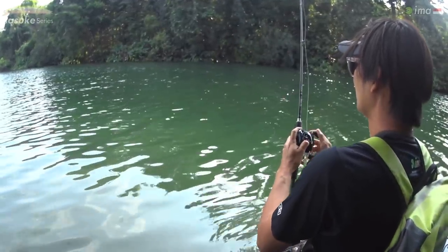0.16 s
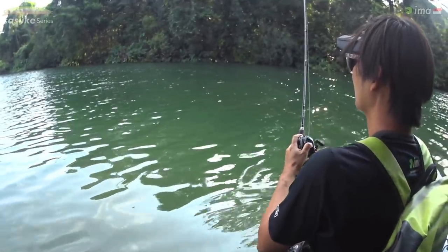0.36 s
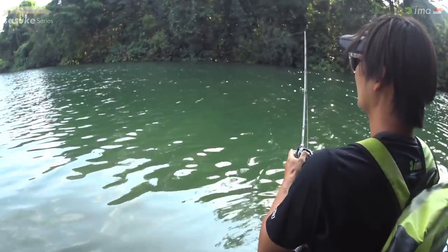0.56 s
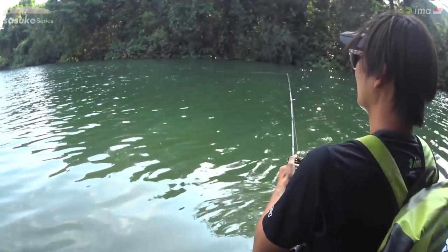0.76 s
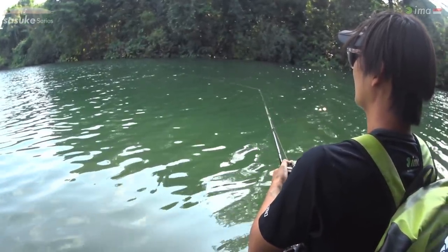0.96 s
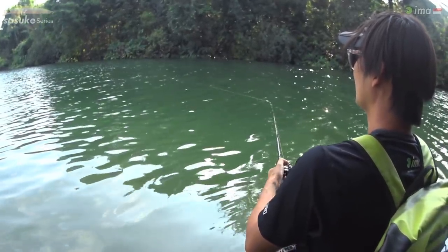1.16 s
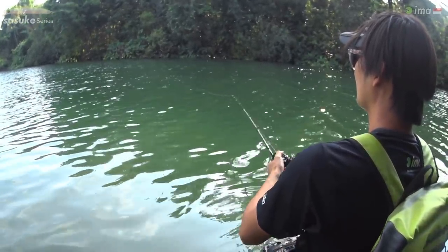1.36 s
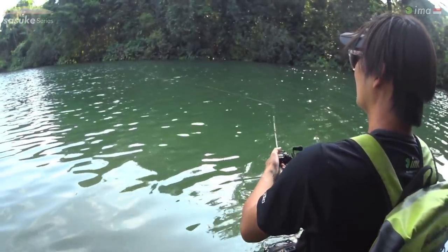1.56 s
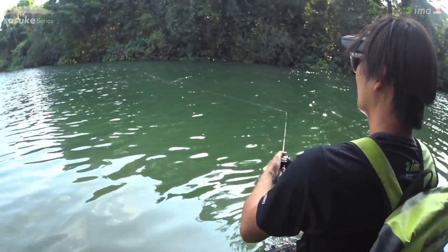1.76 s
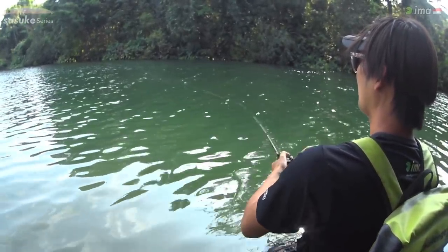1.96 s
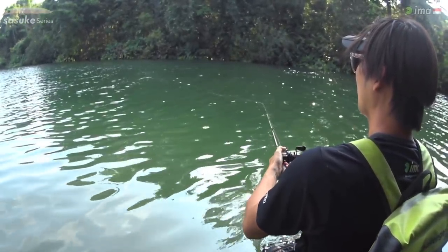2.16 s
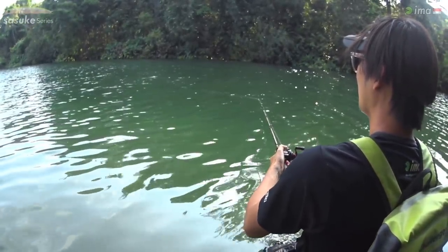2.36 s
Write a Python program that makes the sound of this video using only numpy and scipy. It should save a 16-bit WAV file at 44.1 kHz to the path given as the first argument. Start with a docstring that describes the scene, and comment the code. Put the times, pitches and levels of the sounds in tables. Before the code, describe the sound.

Close to a fishing reel on a quiet pond: one crisp click, a pulsing whine from the spinning spool, then the handle turning with faint ticks. A brief low flutter comes last, while water and leaves wash softly.

```python
"""On a quiet pond below a wooded bank, an angler casts with a baitcasting reel. After a soft rustle
and a creak, the clutch snaps into free spool, its impacts exciting the modes of the metal parts.
The spool sings in surges as line pays out, a harmonic series gliding through fixed resonances.
The handle turns with gear friction and light ticks; a low flutter, perhaps a motor or water on the
hull, sounds near the end. Water and leaves wash, the breeze puffs, and the bank gives a soft echo."""
import sys
import numpy as np
from scipy import signal
from scipy.fft import rfft, irfft
from scipy.io import wavfile

SR = 44100
rng = np.random.default_rng(int(sys.argv[2]) if len(sys.argv) > 2 else 0)


def store_wav(level_fs):
    """Save 16-bit WAV to argv[1]."""
    pcm = np.round(np.clip(np.atleast_2d(level_fs), -1, 1) * 32767)
    wavfile.write(sys.argv[1], SR, pcm.T.astype(np.int16))


N = 105840
TIME, BIN_HZ = np.arange(N) / SR, np.fft.rfftfreq(N, 1 / SR)


def amp(db):
    """Decibels to amplitude ratio."""
    return 10 ** (np.asarray(db) / 20)


def unit(x):
    """Normalisation to rms 1."""
    return x / np.sqrt(np.mean(x ** 2) + 1e-20)


def read(points, hz):
    """Interpolation on a log-frequency axis."""
    f, value = np.transpose(points)
    return np.interp(np.log(hz + 1), np.log(f + 1), value)


def level(points):
    """Gain envelope through rows of time_s, level_db."""
    return amp(np.interp(TIME, *np.transpose(points)))


def colour(x, points):
    """Spectral shaping by rows of frequency_hz, gain_db; the result has rms 1."""
    return unit(irfft(rfft(x) * amp(read(points, np.fft.rfftfreq(len(x), 1 / SR))), len(x)))


def wander(hz):
    """Random modulation: low-passed noise at rms 1."""
    return unit(irfft(rfft(rng.standard_normal(N)) * np.exp(-(BIN_HZ / hz) ** 2), N))


def swell(middle_s, sigma_s):
    """Gaussian envelope."""
    return np.exp(-.5 * ((TIME - middle_s) / sigma_s) ** 2)


def add(mix, start_s, sound):
    """Superposition of a sound on the mix."""
    part = mix[round(start_s * SR):][:len(sound)]
    part += sound[:len(part)]


def diffuse(mid, other, lean=0.3):
    """Diffuse field: an independent signal in the side channel makes left and right partly coherent."""
    # frequency_hz, side_gain_db
    width = [(60, -12), (110, -9), (190, -8.5), (350, -1), (620, 2), (1120, 4), (2010, 3), (3620, -1),
             (6490, -4.5), (11700, -6.5)]
    side_spectrum = 1j * lean * rfft(mid) + np.sqrt(1 - lean ** 2) * rfft(other)
    side = irfft(side_spectrum * amp(read(width, BIN_HZ)), N)
    return np.array([mid + side, mid - side])


def water_and_leaves():
    """Many incoherent sources sum to a steady, slightly wavering wash of noise."""
    # frequency_hz, gain_db
    spectrum = [(15, -60), (25, -11), (50, -1.5), (80, -3.5), (130, -2), (218, -2), (412, -8), (759, -9.5),
                (1510, -15), (2000, -13.5), (3800, -17), (6300, -17.5), (7500, -15), (8970, -22.5),
                (10200, -21.5), (11000, -25.5)]
    # time_s, gain_db
    drift = [(0, -1), (.15, 0.5), (.4, 0.5), (.9, 1), (1.25, 0.5), (1.8, -0.5), (2.4, -0.5)]
    waver_db = 0.99
    mid, other = (colour(rng.standard_normal(N), spectrum) * amp(waver_db * wander(27)) for _ in range(2))
    return amp(-54) * level(drift) * diffuse(mid, other)


def reel_friction(grains_per_s=5000, spread_db=2):
    """Friction as dense random impulses, partly ringing the housing: a soft rustle of the hand on the
    reel and a creak before the snap, then gear rub at each handle stroke."""
    # middle_s, sigma_s, level_db, housing_share
    rubs = [(0.158, 0.053, -58, 0), (.225, 0.0052, -45.5, 0.3), (1.485, 0.016, -47.5, 0.48),
            (1.583, 0.058, -57.5, 0.24), (1.744, .019, -50.5, 0.48), (1.837, 0.028, -58, 0.23),
            (2.037, 0.014, -49.5, 0.6), (2.071, 0.018, -52, 0)]
    # frequency_hz, gain_db
    spectrum = [(200, -15), (450, 4), (750, 1.5), (1250, 6), (1700, 4.5), (2700, -2), (5000, 2.5),
                (9300, -3), (10400, -6), (11000, -4.5)]
    # mode_hz, bandwidth_hz, gain_db
    housing = [(965, 90, 0), (2050, 140, -8), (2750, 200, -14), (3600, 250, -15)]
    grains = rng.standard_normal(N) * amp(spread_db * np.minimum(rng.exponential(1, N), 4))
    grains *= rng.random(N) < grains_per_s / SR
    rub = colour(grains, spectrum)
    hollow = unit(sum(amp(db) * signal.lfilter(*signal.iirpeak(hz, hz / width, SR), grains)
                      for hz, width, db in housing))
    return sum(amp(db) * swell(middle, sigma) * unit(share * hollow + (1 - share) * rub)
               for middle, sigma, db, share in rubs)


def impacts(contacts, low_db=0, top_db=0, decay_scale=1):
    """Impact excitation: each contact knocks the frame and rings the damped modes of the metal parts."""
    # mode_hz, gain_db, t60_s
    modes = [(616, -32, 0.043), (800, -27, 0.045), (1406, -17, 0.033), (2040, -18, 0.033),
             (2450, -16, 0.027), (3330, -16, 0.017), (4530, -11, 0.013), (6120, -5, 0.018),
             (6360, -14, 0.0094), (8930, -12, .022), (8900, -18, .02), (10200, -2, 0.038),
             (10480, -2, .031), (10670, -18, 0.016)]
    # frequency_hz, gain_db
    frame = [(100, -67), (600, -15), (1300, -5.5), (2300, 3.5), (3500, 4.5), (5000, 0.5), (6500, 5.5),
             (8000, 4), (11000, 2)]
    attack_s, knock_s, top_from_hz = 0.00029, .0014, 9600
    out, t = np.zeros(N), np.arange(SR // 10) / SR
    for start_s, db, knock_db in contacts:
        ring = np.zeros(len(t))
        for hz, mode_db, t60 in modes:
            gain = amp(mode_db + (low_db if hz < top_from_hz else top_db))
            decay = 1000. ** (-t / (t60 * decay_scale))
            ring += gain * decay * np.sin(2 * np.pi * (hz * t + rng.random()))
        knock = colour(rng.standard_normal(len(t)), frame) * np.exp(-t / knock_s)
        attack = 1 - np.exp(-t / attack_s)
        add(out, start_s, amp(db) * attack * (amp(-18) * ring + amp(knock_db - 12.5) * knock))
    return out


def clutch_snap():
    """Impact and rebound: a latch tick, the main blow and its bounces, as heard near and at the bank."""
    # start_s, level_db, knock_gain_db
    contacts = [(.2293, -13, 8.5), (.2307, -24, -6), (.2346, -14, -2), (.2399, -13.5, 4), (.2411, -0.5, -1),
                (.2422, -0.5, -0.5), (.2448, 0, -10), (.2519, -7, -22)]
    snap = impacts(contacts)
    far_snap = impacts(contacts, low_db=-22, top_db=-4.5, decay_scale=0.92)  # the knock carries best
    return snap, far_snap


def spool():
    """Forced rotation: each pull of the line spins the spool up; its harmonics rise, then sag, over hiss."""
    # start_s, fastest_s, end_s, top_hz, end_hz, sag_exponent, level_db, jitter_fraction,
    # low_harmonics_db, sag_change_db
    surges = [(0.544, 0.557, 0.68, 1164, 1060, 0.57, -47, 0.0057, -1.5, 0),
              (0.715, 0.733, .772, 1204, 1060, 1.03, -44, .012, 0.5, 0),
              (0.811, 0.829, .862, 1210, 1058, 1.26, -43.5, .014, -1.5, -1.5),
              (0.898, 0.915, .946, 1251, 1050, 1.25, -44, 0.023, -1.5, -1.5),
              (.973, 0.988, 1.007, 1234, 1045, 1.3, -44, 0.027, -2.5, -3),
              (1.052, 1.071, 1.094, 1215, 1065, 1.35, -45.5, 0.024, -2, -5),
              (1.14, 1.165, 1.185, 1184, 1068, 1.37, -48.5, 0.027, 0, 2),
              (1.319, 1.341, 1.396, 1233, 1118, 1.176, -44, .008, 3.5, -5)]
    # harmonic_number, gain_db
    harmonics = [(3, -19.5), (4, -3.5), (5, -3.5), (6, -6.5), (7, -14), (8, -28)]
    # frequency_hz, gain_db
    hiss_spectrum = [(2000, -12.5), (3800, -11.5), (4700, 2.5), (5300, -2), (6000, -2), (7200, -2.5),
                     (8500, -9), (11000, -16.5)]
    # time_s, level_db
    hiss_level = [(.53, -80), (.62, -62), (.76, -59.5), (.95, -53.5), (1.2, -57), (1.3, -62), (1.4, -58),
                  (1.52, -61), (1.65, -64)]
    start_hz, attack_s, release_s, rasp_db = 1038.5, 0.011, 0.0086, -16
    tone, effort = np.zeros(N), np.zeros(N)
    jitter = wander(490)
    flickers = [1 + 0.43 * wander(130) for _ in harmonics]
    for start, fastest, end, top_hz, end_hz, curve, db, rough, low_db, fade_db in surges:
        at = (TIME > start) & (TIME < end + 5 * release_s)
        t = TIME[at]
        rise = np.sin(np.pi / 2 * np.clip((t - start) / (fastest - start), 0, 1)) ** 2
        sag = np.clip((t - fastest) / (end - fastest), 0, 1)
        hz = start_hz + (top_hz - start_hz) * rise + (end_hz - top_hz) * sag ** curve
        phase = 2 * np.pi * np.cumsum(hz * (1 + rough * jitter[at])) / SR
        attack = np.minimum((t - start) / attack_s, 1) ** 1.1
        release = np.exp(-np.maximum(t - end + release_s, 0) / release_s)
        envelope = amp(db + fade_db * sag) * attack * release
        effort[at] += envelope
        for (k, k_db), flicker in zip(harmonics, flickers):
            tone[at] += envelope * flicker[at] * amp(k_db + low_db * (k <= 4)) * np.sin(k * phase)
    hiss = colour(rng.standard_normal(N), hiss_spectrum) * (amp(rasp_db) * effort + level(hiss_level))
    return reel_body(tone + hiss)


def reel_body(x):
    """Resonances and antiresonances in series lift or cut each harmonic that sweeps through them."""
    # centre_hz, bandwidth_hz, gain_db
    peaks = [(4300, 73, 0.5), (4630, 150, -4.5), (4850, 83, 1), (5150, 210, -8.5), (5480, 300, 4.5),
             (5780, 130, -4), (6010, 130, 7.5), (6140, 220, -4), (6280, 51, 9), (6950, 190, 0.5),
             (7500, 260, -8)]
    for hz, width, db in peaks:
        a, g = np.pi * width / SR, amp(db / 2)
        tuning = -2 * np.cos(2 * np.pi * hz / SR)
        x = signal.lfilter([1 + a * g, tuning, 1 - a * g], [1 + a / g, tuning, 1 - a / g], x)
    return x


def breeze():
    """Turbulence at the microphone: puffs of low narrow-band noise."""
    # middle_s, sigma_s, level_db, centre_hz
    puffs = [(0.693, 0.016, -49.5, 105), (0.768, 0.074, -56, 62), (2.08, 0.032, -49, 54.2)]
    return sum(amp(db) * swell(middle, sigma) * wander(30) * np.sqrt(2) * np.sin(2 * np.pi * hz * TIME)
               for middle, sigma, db, hz in puffs)


def gear_ticks():
    """Light impacts of the gears ring mainly the top modes, which decay quickly."""
    # start_s, level_db, knock_gain_db
    contacts = [(.897, -38, 13), (1.41, -53, 6), (1.452, -36, -8), (1.495, -35, 5), (1.509, -27.5, 1),
                (1.538, -38, 6), (1.552, -29, -4), (1.718, -38, 6), (1.738, -34, -7), (1.762, -34, -4),
                (1.809, -30.5, -10), (1.881, -44, 5), (2.02, -40, 8), (2.071, -41, 10), (2.09, -34, 10),
                (2.098, -37, 8)]
    return impacts(contacts, low_db=-18, decay_scale=0.81)


def low_flutter(start_s=2.005, pulses_per_s=47, thud_hz=94.6, thud_s=0.0076):
    """A periodic pulse train drives a damped low resonance: perhaps a motor or water on the hull."""
    # time_s, level_db
    pulse_level = [(2.0, -71), (2.05, -37), (2.09, -45.5), (2.118, -54), (2.22, -60.5), (2.3, -64),
                   (2.4, -78)]
    t = np.arange(SR // 10) / SR
    pulses = np.diff(np.floor((TIME - start_s) * pulses_per_s), prepend=0) > 0
    thud = np.sin(2 * np.pi * thud_hz * t) * t / thud_s * np.exp(1 - t / thud_s)
    return signal.fftconvolve(pulses * level(pulse_level), thud)[:N]


def direct_path(x):
    """Phase and level differences place the reel: the left channel leads and is slightly weaker."""
    # frequency_hz, left_lead_rad
    lead = [(20, 0), (450, 0), (1100, 1.55), (2500, 0.95), (3900, 1.4), (5600, 0.49), (7500, 0.72),
            (11000, 0.28)]
    left = np.exp(.5j * read(lead, BIN_HZ)) * amp(-0.9)
    return irfft(rfft(x) * np.array([left, 1 / left]), N)


def bank_echo(x, delay_s=.012):
    """Scattering from boat, water and trees: a delayed noise tail, each band decaying at its own rate."""
    # frequency_hz, t60_s
    decay = [(300, 0.35), (1300, 0.19), (3500, 0.37), (4800, 0.5), (6000, 0.36), (10000, 0.26)]
    hz, t, bands = signal.stft(rng.standard_normal((2, SR // 2)), SR, nperseg=256)
    tail = signal.istft(bands * 1000. ** (-t / read(decay, hz)[:, None]), SR, nperseg=256)[1]
    tail = np.pad(tail / np.linalg.norm(tail[0]), ((0, 0), (round(delay_s * SR), 0)))
    return diffuse(*signal.fftconvolve(x[None], tail, axes=1)[:, :N])


def scene():
    """Superposition of the reel's direct sound, its echo and the outdoor background."""
    snap, far_snap = clutch_snap()
    whir = spool()
    handling = reel_friction() + gear_ticks()
    echo = bank_echo(amp(-12.5) * far_snap + amp(-7.5) * whir + amp(-10.5) * handling)
    return direct_path(snap + whir + handling) + echo + low_flutter() + breeze() + water_and_leaves()


def record(dry):
    """Band limiting by a steep linear-phase low-pass filter."""
    cutoff_hz = 11080
    lowpass = signal.firwin(1023, cutoff_hz, window=("kaiser", 8), fs=SR)
    return signal.oaconvolve(dry, lowpass[None], "same")


dry = scene()
out = record(dry)
store_wav(out)
```